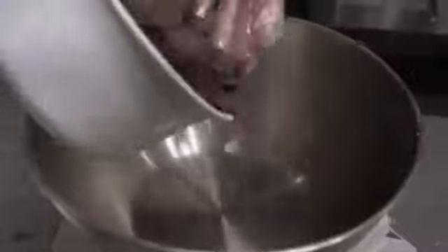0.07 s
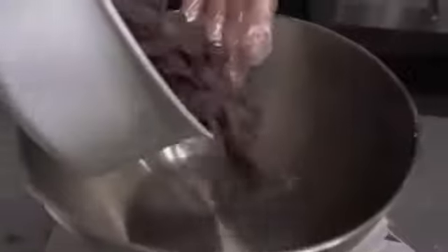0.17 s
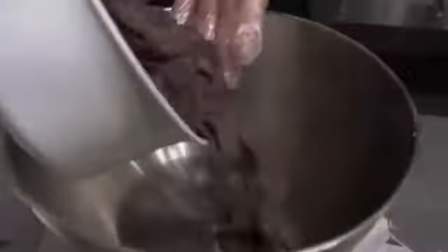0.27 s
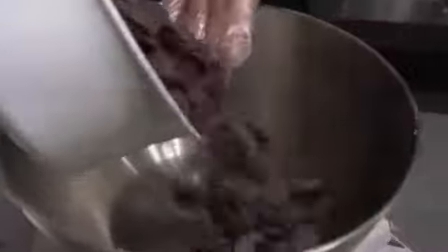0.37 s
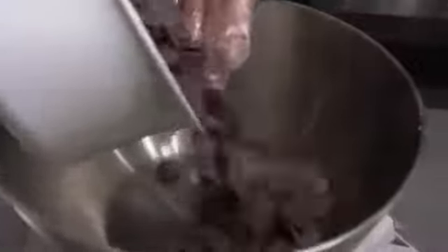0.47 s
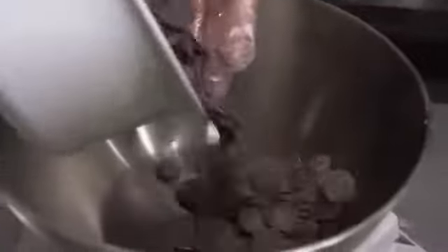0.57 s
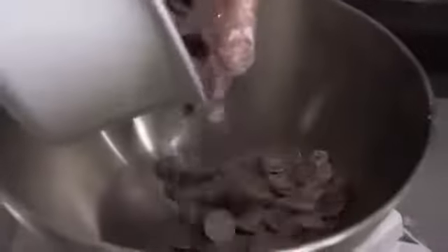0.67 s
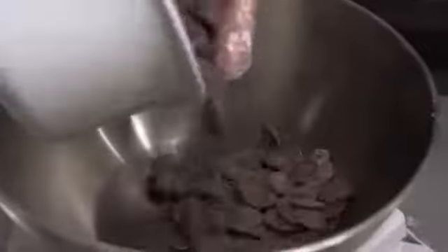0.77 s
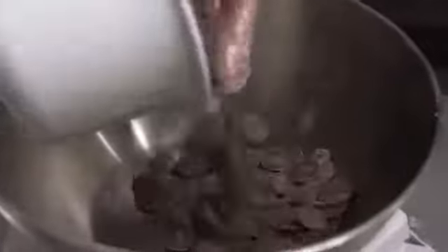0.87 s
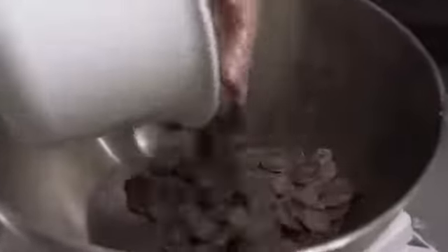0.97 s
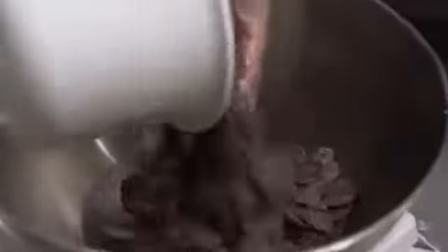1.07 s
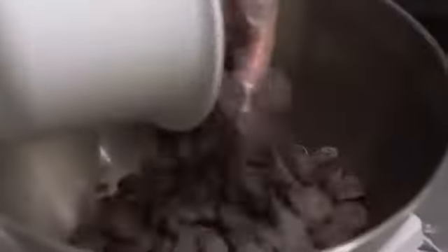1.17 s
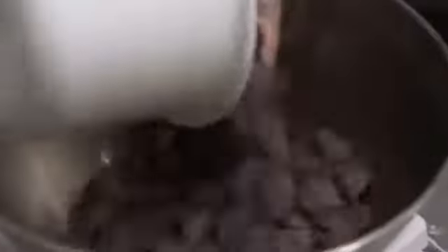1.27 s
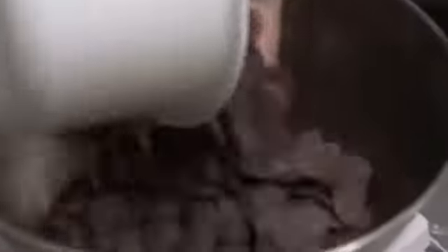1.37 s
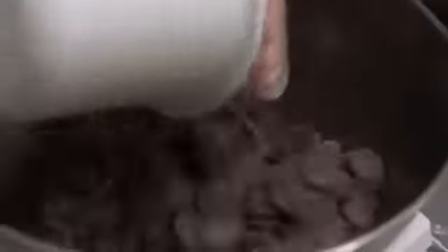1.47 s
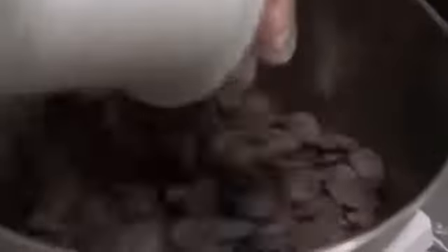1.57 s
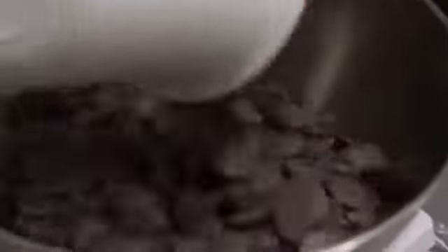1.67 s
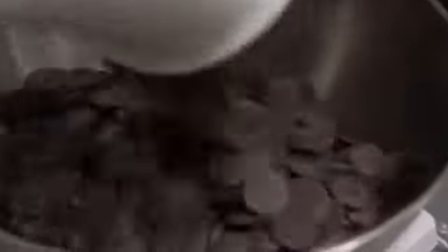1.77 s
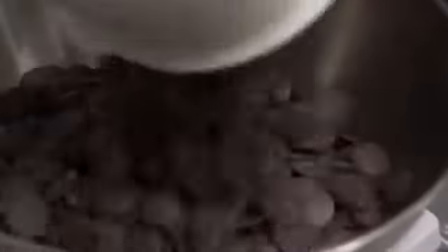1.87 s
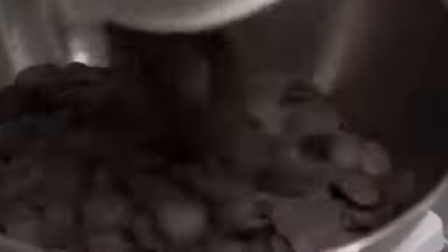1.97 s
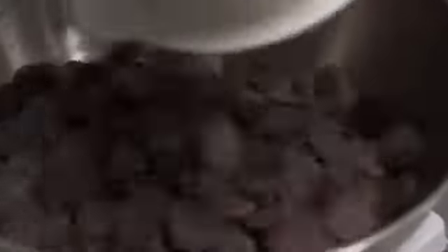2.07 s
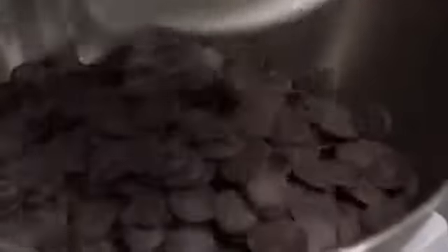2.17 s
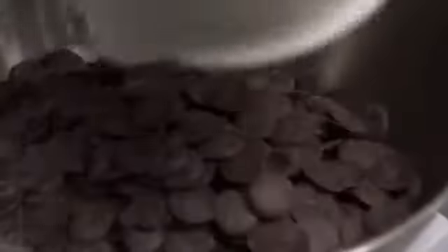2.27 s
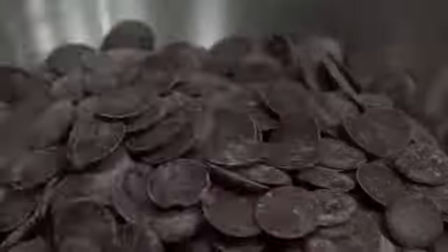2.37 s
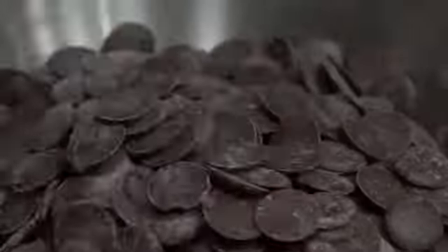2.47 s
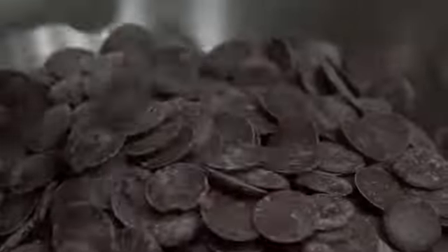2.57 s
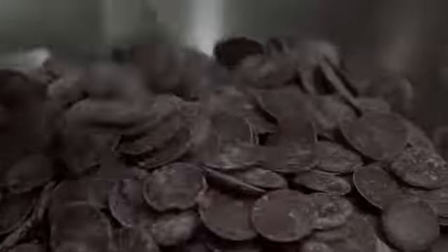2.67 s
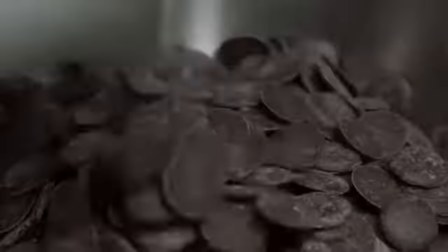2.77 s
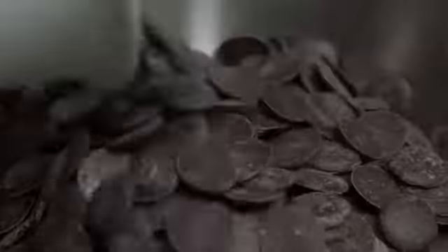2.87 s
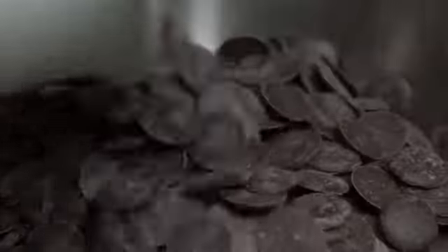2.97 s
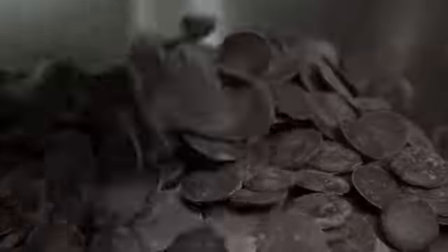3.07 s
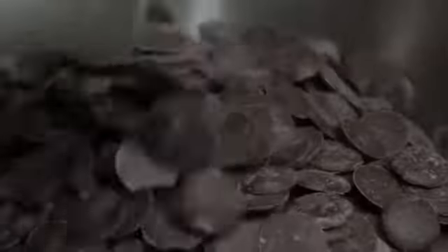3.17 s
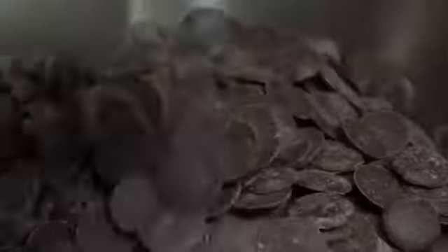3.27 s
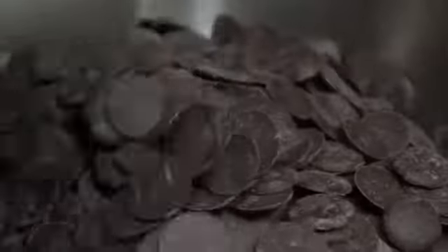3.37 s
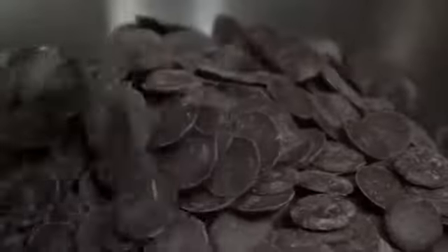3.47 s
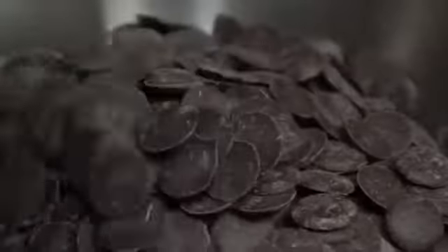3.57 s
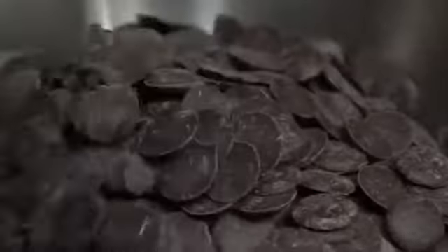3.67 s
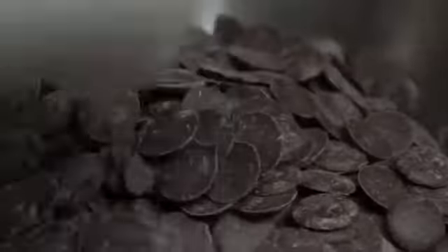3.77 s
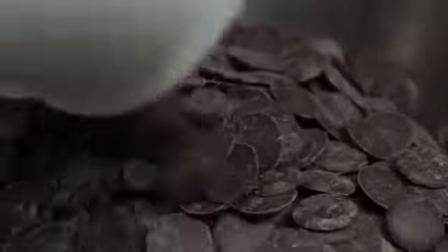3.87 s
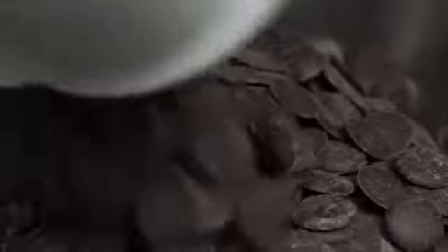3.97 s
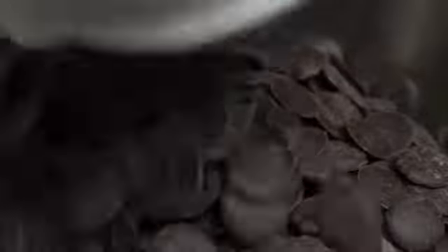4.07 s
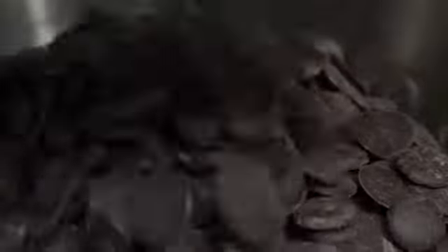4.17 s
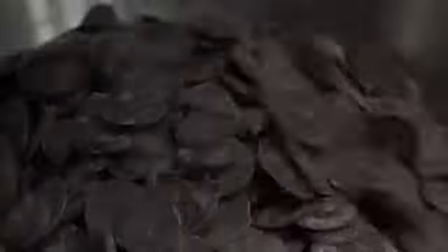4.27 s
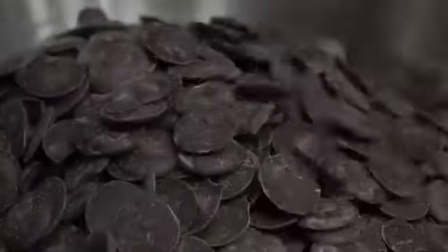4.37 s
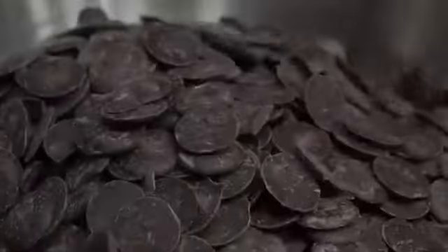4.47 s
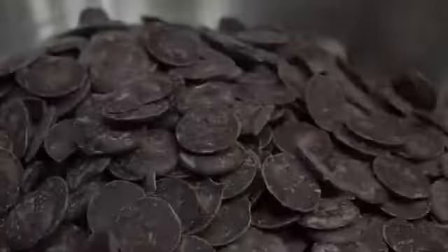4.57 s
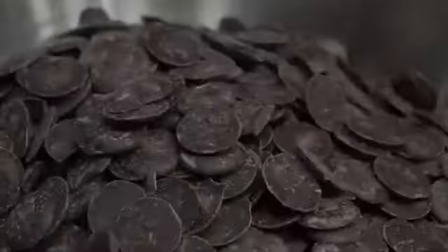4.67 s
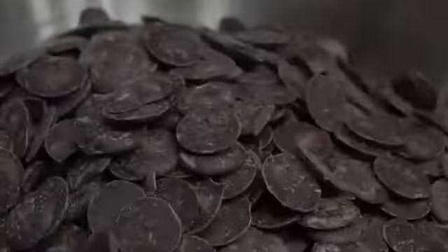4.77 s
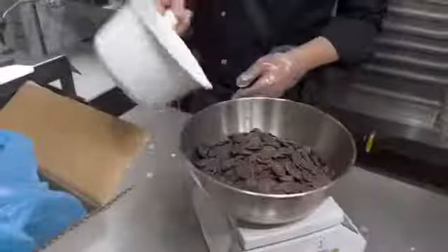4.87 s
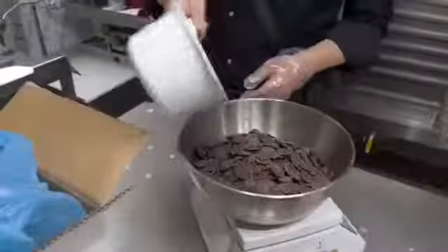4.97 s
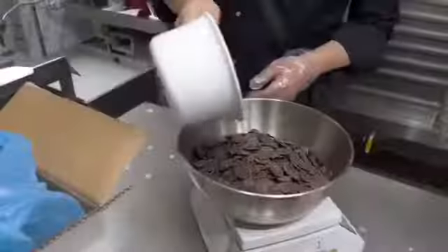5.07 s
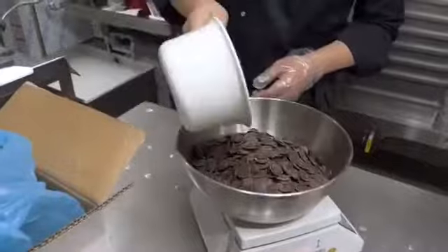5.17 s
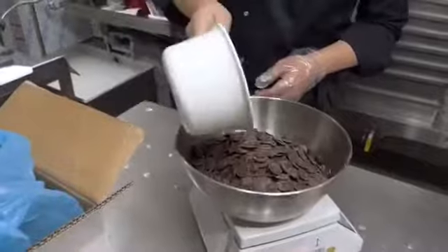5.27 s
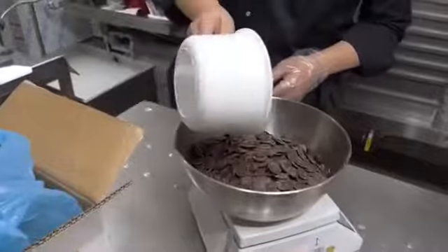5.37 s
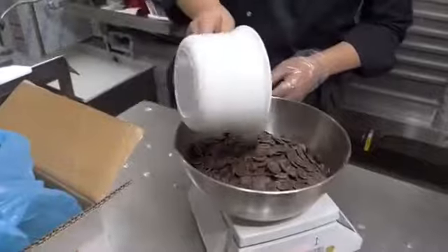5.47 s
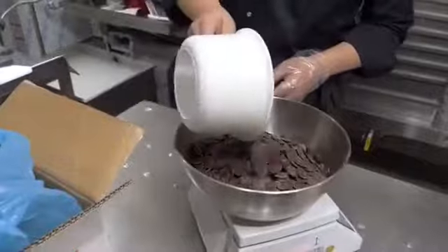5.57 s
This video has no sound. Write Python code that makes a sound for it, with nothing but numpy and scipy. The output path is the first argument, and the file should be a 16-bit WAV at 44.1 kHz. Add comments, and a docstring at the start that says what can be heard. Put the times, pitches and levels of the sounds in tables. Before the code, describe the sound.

Chocolate discs crash from a plastic tub into a bare steel bowl, ringing at first, then clattering drily onto the growing heap in a kitchen.

```python
"""Chocolate discs crash from a plastic tub into a bare steel bowl, then rattle on the growing heap in a kitchen.
Discs clack on each other or glance off the ringing wall, some knock the tub, and a soft bump shakes the microphone.
Strikes and taps are noise bursts through resonances, knocks pitched noise, the rattle streams of random clicks.
The bump is two short sine wobbles with rough noise; machines murmur as coloured noise with two blurred tones."""
import sys
import numpy as np
from scipy import signal
from scipy.fft import rfft, irfft
from scipy.io import wavfile

SR = 44100
rng = np.random.default_rng(int(sys.argv[2]) if len(sys.argv) > 2 else 0)


def output_pcm(signal):
    """Save a mono or channel-first signal as 16-bit PCM at the path in sys.argv[1].

    Samples are clipped to [-1, 1] before scaling.
    """
    pcm = np.clip(np.atleast_2d(signal).T, -1, 1) * 32767
    wavfile.write(sys.argv[1], SR, np.round(pcm).astype(np.int16))


N = 247842

# bowl bottom modes: (frequency [Hz], width [Hz], relative level [dB])
BOTTOM_MODES = [(369.5, 50, 1), (1036, 64, 3.5), (1340, 100, 0), (1588, 87, 5.5), (1864, 48, 7),
                (2256, 100, 1), (3117, 360, 0)]


def from_db(db):
    """Gain of a level in dB."""
    return 10 ** (np.asarray(db) / 20)


def rms_one(x):
    """Scaled to rms 1."""
    return x / np.sqrt(np.mean(x ** 2) + 1e-20)


def white():
    """White noise of scene length."""
    return rng.standard_normal(N)


def band(x, low_hz, high_hz):
    """Band-pass."""
    return signal.sosfilt(signal.butter(2, [low_hz, high_hz], "band", fs=SR, output="sos"), x)


def resonate(x, hz, width_hz):
    """One two-pole resonance, gain about 1 on top."""
    r = np.exp(-np.pi * width_hz / SR)
    feedback = [1, -2 * r * np.cos(2 * np.pi * hz / SR), r * r]
    return signal.lfilter(np.array([1, 0, -1]) * (1 - r * r) / 2, feedback, x)


def body(x, modes):
    """Resonances in parallel, signs alternating."""
    out = 0
    for k, (hz, width_hz, db) in enumerate(modes):
        out = out + (-1) ** k * from_db(db) * resonate(x, hz, width_hz)
    return out


def dying(t60_s, length_s):
    """Exponential fall, 60 dB in t60_s."""
    return from_db(-60 * np.arange(int(length_s * SR)) / SR / max(t60_s, .002))


def through(x, response):
    """Convolution with a response scaled to unit energy."""
    return signal.fftconvolve(x, response / np.sqrt(np.sum(response ** 2)))[:N]


def bursts(start_s, db, t60_s):
    """Blow envelopes: a sharp first touch plus a longer fall; powers add."""
    touch_db, touch_t60_s, rise_s = 2.5, 0.0053, 0.001
    power = np.zeros(N + SR)
    touch = (from_db(touch_db) * dying(touch_t60_s, .4)) ** 2
    starts = np.round(start_s * SR).astype(int)
    for start, gain, fall_s in zip(starts, from_db(db), t60_s):
        power[start:start + len(touch)] += gain ** 2 * (dying(fall_s, .4) ** 2 + touch)
    r = np.exp(-1 / (rise_s * SR))
    return np.sqrt(signal.lfilter([1 - r], [1, -r], power[:N]))


def lingering(envelope, t60_s):
    """Envelope of energy stored by blows and given off over t60_s."""
    r = from_db(-120 / (t60_s * SR))  # power per sample
    return np.sqrt(signal.lfilter([1 - r], [1, -r], envelope ** 2))


def gritty():
    """White noise in uneven lumps, as from many contacts in a rush."""
    lumps_db = 2.0 * rms_one(band(white(), 43, 300))
    return rms_one(white() * from_db(lumps_db))


def background():
    """Machine murmur: steady coloured noise plus two tones blurred by narrow-band filtering."""
    murmur_db = -47
    # murmur spectrum: (frequency [Hz], relative density [dB per Hz])
    spectrum = [(25, -21.5), (60, -10.5), (130, 7.5), (300, 13), (700, 9), (1100, 5), (2500, -2.5),
                (5000, -9), (8000, -8.5), (15000, -24)]
    # wavering machine tones: (frequency [Hz], width [Hz], rms level [dB])
    hum_tones = [(101, 27, -58), (183.7, 8.6, -58)]
    hz, points = np.fft.rfftfreq(N, 1 / SR) + 1, np.array(spectrum)
    colour = from_db(np.interp(np.log(hz), np.log(points[:, 0]), points[:, 1]))
    out = from_db(murmur_db) * rms_one(irfft(rfft(white()) * colour, N))
    for tone_hz, width_hz, db in hum_tones:
        out = out + from_db(db) * rms_one(resonate(white(), tone_hz, width_hz))
    return out


def flow():
    """Dull, middle and bright rattle levels [dB]: each surge swells, runs its length and ebbs."""
    swell_db_per_s, ebb_db_per_s = 491.5, 255.5
    # the dull rattle varies less between surges and is muffled as the heap grows
    dull_offset_db, dull_follows, dull_loss_db_per_s = -13.5, 0.62, 1.5
    # rattle surges, from pours and from the bump:
    # (start [s], length [s], first level [dB], last level [dB], treble over middle [dB])
    rattle_surges = [(0.042, 0.24, -61, -29.5, -1.5), (0.283, 0.4, -21, -28.5, 4),
                     (0.766, 0.068, -28, -36.5, -7), (0.908, 0.033, -26.5, -35.5, 4),
                     (1.003, .68, -28.5, -25.5, 5.5), (1.709, 0.414, -32.5, -32.5, 11.5),
                     (2.605, 0.37, -38.5, -40.5, -0.5), (3.043, .22, -32.5, -42.5, 4),
                     (3.49, 0.012, -40.5, -48, 3), (3.854, 0.513, -39, -35.5, 2.5),
                     (4.776, 0.011, -37, -41, -19), (5.398, 0.12, -44, -47, -18),
                     (5.54, .08, -39.5, -42.5, 4.5)]
    t = np.arange(0, N + 64, 64) / SR
    start_s, length_s, first_db, last_db, treble_db = np.transpose(rattle_surges)[:, :, None]
    db = first_db + (last_db - first_db) * np.clip((t - start_s) / length_s, 0, 1)
    db = db - swell_db_per_s * np.maximum(start_s - t, 0)
    db = db - ebb_db_per_s * np.maximum(t - start_s - length_s, 0)
    dull_db = dull_offset_db + dull_follows * last_db + db - last_db - dull_loss_db_per_s * t
    sample_s = np.arange(N) / SR
    return [np.interp(sample_s, t, level.max(axis=0)) for level in (dull_db, db, db + treble_db)]


def stream():
    """Rattle of countless small, briefly ringing contacts, unsteady; dull ones sound through the bottom."""
    contacts_per_s, size_spread_db, rattle_q = (1100, 1600, 2200), 3.5, 4.4 / 4.8
    flutter_db, treble_fall_hz = 2, 13100
    # lowest bottom mode, damped as the bowl fills
    boom_db, boom_loss_db_per_s = 13.5, 4.5
    # hollows of the heap: (frequency [Hz], width [Hz], relative level [dB])
    hollows = [(527, 233, 3.5), (1094, 81, -3)]
    levels_db = flow()
    flutter = from_db(flutter_db * rms_one(band(white(), 4.9, 33.0)))
    edges_hz, out = [330, 1200, 7500, 12500], 0
    for k in range(3):
        sizes_db = size_spread_db * np.minimum(rng.exponential(1, N), 5)
        sizes = from_db(sizes_db) * rng.choice([-1, 1], N)
        clicks = sizes * (rng.random(N) < contacts_per_s[k] / SR) + 1e-18
        dealt = rng.integers(0, 8, N)  # which of eight pitches each click excites
        rings = 0
        for j, hz in enumerate(np.geomspace(edges_hz[k], edges_hz[k + 1], 8)):
            rings = rings + resonate(clicks * (dealt == j), hz, hz / rattle_q)
        if k == 0:
            boom = from_db(boom_db - boom_loss_db_per_s * np.arange(N) / SR)
            rings = rings + boom * body(rings, BOTTOM_MODES[:1]) + body(rings, hollows)
        if k == 2:
            rings = band(rings, 4400, treble_fall_hz)
        out = out + from_db(levels_db[k]) * rms_one(rings)
    return flutter * out


def clacks():
    """Single clacks and knocks: a snap at the onset of a dry pitched knock and a bright tick."""
    knock_t60_s, tick_t60_s, knock_q = 0.034, 0.023, 3.05
    # discs knocking on each other, and late dull knocks on the tub:
    # (time [s], relative knock level [dB], pitch [Hz], relative tick level [dB])
    clack_table = [(0.068, -17.5, 1320, -60), (0.123, -26, 1445, -65), (0.151, -22, 3160, -44),
                   (0.174, -20.5, 2960, -46), (0.761, -12, 6100, -21), (0.773, -22, 5030, -24),
                   (0.798, -20, 5800, -17), (0.817, -12, 5800, -34), (0.839, -20.5, 1050, -13.5),
                   (0.873, -20.5, 4100, -14), (0.898, -20, 1530, -17), (0.923, -16, 5330, -8),
                   (0.974, -14, 1560, -38), (1.005, -9.5, 5500, -11), (1.019, -10, 1820, -23),
                   (1.055, -32, 5500, -31), (1.094, -17, 5540, -9), (1.111, -9, 1530, -21),
                   (1.128, -14, 5400, -10), (1.178, -12, 5900, -14), (1.348, -18, 5700, -14),
                   (2.128, -29, 3500, -33), (2.32, -32, 5000, -37.5), (2.417, -26, 1680, -52),
                   (2.462, -24.5, 1210, -33), (2.507, -18.5, 3300, -49), (2.512, -14.5, 3300, -48),
                   (2.564, -29, 3350, -21), (2.582, -12, 1800, -32), (2.583, -10, 4400, -12),
                   (2.638, -22, 1450, -16), (2.65, -21.5, 5640, -23), (2.681, -18, 1690, -30),
                   (2.729, -18, 4770, -15.5), (2.757, -25, 4430, -19), (2.838, -23.5, 2300, -27),
                   (2.862, -19, 1860, -17), (2.898, -22, 3200, -20), (2.916, -23, 4510, -15.5),
                   (2.926, -22, 4470, -16), (2.937, -22, 5510, -15), (3.064, -12, 1230, -35),
                   (3.126, -14, 5660, -18), (3.316, -28, 4400, -37), (3.343, -24, 5130, -33),
                   (3.477, -27, 3000, -31), (3.536, -36, 900, -31), (3.597, -28, 5440, -45),
                   (3.714, -29.5, 1860, -39), (3.813, -27, 1860, -52), (3.845, -23, 2830, -58),
                   (3.855, -26, 4930, -28), (3.893, -27, 1890, -46), (3.917, -29, 2300, -44),
                   (3.956, -27, 5020, -22.5), (3.98, -20, 2680, -30), (4, -32, 5530, -20),
                   (4.016, -23, 5570, -14), (4.158, -20.5, 1000, -32), (4.279, -16, 900, -34),
                   (4.76, -27, 1090, -37), (4.85, -13, 2900, -49), (4.895, -30, 2960, -60),
                   (4.91, -24.5, 780, -65), (4.97, -35.5, 900, -60), (5.099, -22, 3600, -54),
                   (5.197, -27, 3900, -61), (5.381, -29, 5300, -32), (5.4, -30, 5000, -24),
                   (5.524, -27.5, 5100, -31), (5.542, -29, 5600, -23.5), (5.612, -25.5, 5000, -26)]
    out, size = np.zeros(N + SR), SR // 10
    snap = 1 + from_db(5.5) * dying(0.0044, .1)
    noises = rng.standard_normal((len(clack_table), 2, size))
    for (start_s, knock_db, hz, tick_db), noise in zip(clack_table, noises):
        knock = rms_one(resonate(noise[0], hz, hz / knock_q)) * dying(knock_t60_s, .1)
        tick = rms_one(band(noise[1], 7900, 12000)) * dying(tick_t60_s, .1)
        clack = from_db(knock_db - 7) * knock + from_db(tick_db - 1.0) * tick
        out[round(start_s * SR):][:size] += snap * clack
    return out[:N]


def strikes():
    """Envelopes on wall, bottom and rim: the rising heap shields the bottom more and more."""
    # bottom relative to wall, bare and buried; ramp length
    bare_db, buried_db, burial_s = -3, -31.5, 1.0
    # discs on steel: (time [s], relative wall level [dB], rim over wall [dB], clatter t60 [s])
    strike_table = [(0.2057, 1.5, -3.5, 0.12), (0.2769, 5, -3.5, 0.28), (0.299, 8, 3.5, 0.033),
                    (0.3426, -8.5, -11.5, 0.11), (0.387, -4.5, -7, 0.09), (0.4332, 3, -3.5, 0.03),
                    (0.446, -8, 1.5, 0.043), (0.5074, -12, 2.5, 0.22), (0.552, -5, -9, 0.047),
                    (0.5916, -21.5, 10.5, 0.064), (0.623, -13.5, -3, 0.058), (1.233, -3.5, -9, 0.025),
                    (1.243, -2, -4, 0.18), (1.294, -2, -12.5, 0.18), (1.309, -9.5, 2, 0.054),
                    (1.3706, -13.5, 8, 0.15), (1.4083, 0, -9.5, 0.11), (1.428, 0, -14, 0.14),
                    (1.4602, 0.5, 0.5, 0.046), (1.4875, -3, -10, 0.14), (1.512, -3, -5, 0.09),
                    (1.539, -4.5, -6, 0.08), (1.568, -2.5, -2.5, 0.055), (1.603, -8, -8, 0.066),
                    (1.636, -13.5, -1, 0.041), (1.673, -10, -1, 0.04), (1.691, -15, 5, 0.032),
                    (1.7326, -15.5, 5.5, 0.074), (1.8038, -6.5, -11, 0.029), (1.834, -7, -17, 0.037),
                    (1.8505, -3.5, -6, 0.067), (1.9156, -10.5, -1.5, 0.096), (2.049, -3.5, -16.5, 0.079),
                    (2.068, -12, -10, 0.049), (2.0826, -7, -17, 0.04), (2.151, 1, -13, 0.058),
                    (2.176, -16.5, 0.5, 0.051), (2.2695, -23.5, -15, 0.05), (3.0324, -5, -11, 0.08),
                    (3.1083, -21, -26, 0.32), (3.1493, -9.5, -17, 0.1), (3.199, -17, -11, 0.025),
                    (3.375, -14.5, -13.5, 0.082), (3.76, -29, -6.5, 0.056), (4.0149, -19, -4.5, 0.051),
                    (4.065, 0, -14, 0.036), (4.159, 3.5, -24, 0.04), (4.273, 9, -14, 0.034),
                    (4.2791, 3, -15, 0.021), (4.3026, 2.5, -19, 0.013), (4.352, -9, -47, 0.08),
                    (4.3797, 4.5, -19.5, 0.021)]
    start_s, wall_db, rim_db, t60_s = np.transpose(strike_table)
    buried = np.clip((start_s - start_s[0]) / burial_s, 0, 1)
    bottom_db = wall_db + bare_db + buried * (buried_db - bare_db)
    return [bursts(start_s, db, t60_s) for db in (wall_db, bottom_db, wall_db + rim_db)]


def steel():
    """Strikes clatter in wall, rim and bottom; dense wall and bottom modes ring on as dying noise."""
    ring_cut_s = 2.332  # stored wall ringing breaks off; later strikes ring anew
    tail_db, tail_t60_s, bottom_lowest_hz = -22, 0.47, 308
    # crowds of dense wall modes: (frequency [Hz], width [Hz], relative level [dB])
    wall_modes = [(4400, 480, -5), (5230, 360, -1), (5750, 480, -1)]
    # ringing of each wall crowd: (relative level [dB], t60 [s])
    wall_rings = [(-18.5, 0.2), (-12.5, 0.03), (-15, 0.16)]
    # rim modes: (frequency [Hz], width [Hz], relative level [dB])
    rim_modes = [(6210, 67, 9.5), (7200, 1200, 3), (8840, 470, 3), (11900, 5200, -12)]
    on_wall, on_bottom, on_rim = strikes()
    before = np.arange(N) < ring_cut_s * SR
    wall = body(body(on_wall * gritty(), wall_modes), wall_modes) * from_db(8)
    for (hz, width_hz, _), (db, t60_s) in zip(wall_modes, wall_rings):
        crowd = rms_one(resonate(resonate(white(), hz, width_hz), hz, width_hz))
        ringing = before * lingering(on_wall, t60_s) + lingering(on_wall * ~before, t60_s)
        wall = wall + from_db(db) * ringing * crowd
    rim = on_rim * rms_one(body(gritty(), rim_modes)) * from_db(-1.5)
    bottom = on_bottom * rms_one(body(gritty(), BOTTOM_MODES)) * from_db(-2.5)
    tail = lingering(on_bottom, tail_t60_s) * rms_one(body(white(), BOTTOM_MODES))
    return wall + rim + band(bottom + from_db(tail_db) * tail, bottom_lowest_hz, 9000)


def taps():
    """Stray discs tapping the plastic tub: short rough contacts ring its modes."""
    tap_t60_s = 0.015
    # taps: (time [s], relative level [dB])
    tap_table = [(3.477, -24), (3.494, -37), (5.0995, -16), (5.113, -17), (5.131, -16.5), (5.197, -23),
                 (5.299, -22.5)]
    # tub modes: (frequency [Hz], width [Hz], relative level [dB])
    tub_modes = [(1603, 68, 13), (2160, 290, 2.5), (2870, 520, -1), (3500, 150, 2.5), (4420, 440, -4)]
    start_s, db = np.transpose(tap_table)
    envelope = bursts(start_s, db, np.full(len(start_s), tap_t60_s))
    return body(envelope * white() + 1e-18, tub_modes)


def bump():
    """Microphone shaken by a sharp jolt and slower wobble with rough noise; the bowl hums on, dying away."""
    tail_db, tail_t60_s = -39.5, 1
    # jolt, then wobble: (time [s], frequency [Hz], Gaussian sigma [s], sine level [dB])
    wobbles = [(4.7798, 170, .0026, -15), (4.789, 95, .008, -26)]
    t = np.arange(N) / SR
    since_s = t - wobbles[0][0]
    knock = from_db(-14) * rms_one(band(white(), 150, 800))
    fall = (since_s > 0) * from_db(tail_db - 60 * np.abs(since_s) / tail_t60_s)
    out = fall * rms_one(band(white(), 530, 755))
    for centre_s, hz, sigma_s, db in wobbles:
        late_s = t - centre_s
        swing = np.sin(2 * np.pi * hz * late_s) + knock
        out = out - from_db(db) * np.exp(-(late_s / sigma_s) ** 2 / 2) * swing
    return out


def kitchen(x):
    """Diffuse, duller echo: delayed, exponentially dying band-passed noise as room response."""
    delay_s, t60_s, cut_hz = 0.0065, 0.36, 6700
    tail = band(rng.standard_normal(SR // 2), 130, cut_hz) * dying(t60_s, .5)
    return through(x, np.concatenate([np.zeros(int(delay_s * SR)), tail]))


def scene():
    """Everything at the microphone; discs, bowl and tub also excite the room."""
    room_db = -16
    near = steel() + clacks() + stream() + taps()
    return (near + from_db(room_db) * kitchen(near) + bump() + background())[None]


def record(dry):
    """Microphone: treble dip, soft overload on the loudest crashes, bass and top cut off."""
    dip_hz, dip_width_hz, dip_share = 10170, 3520, 0.74
    bass_cut_hz, stopband_hz = 85, 15644
    coloured = dry - dip_share * resonate(dry, dip_hz, dip_width_hz)
    clipped = .9 * coloured / (1 + np.abs(coloured) ** 8) ** (1 / 8)
    thinned = signal.sosfilt(signal.butter(1, bass_cut_hz, "high", fs=SR, output="sos"), clipped)
    return signal.sosfilt(signal.cheby2(14, 60, stopband_hz, fs=SR, output="sos"), thinned)


dry = scene()
out = record(dry)
output_pcm(out)
```